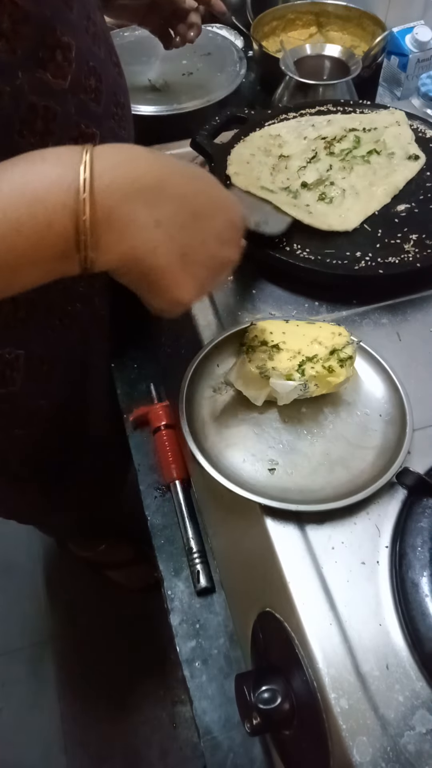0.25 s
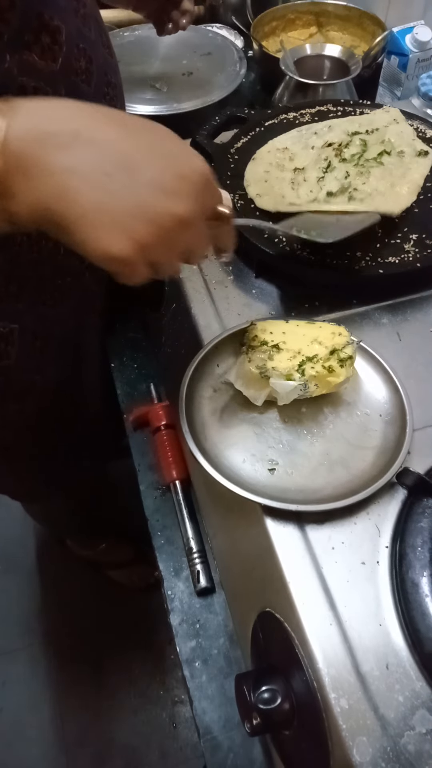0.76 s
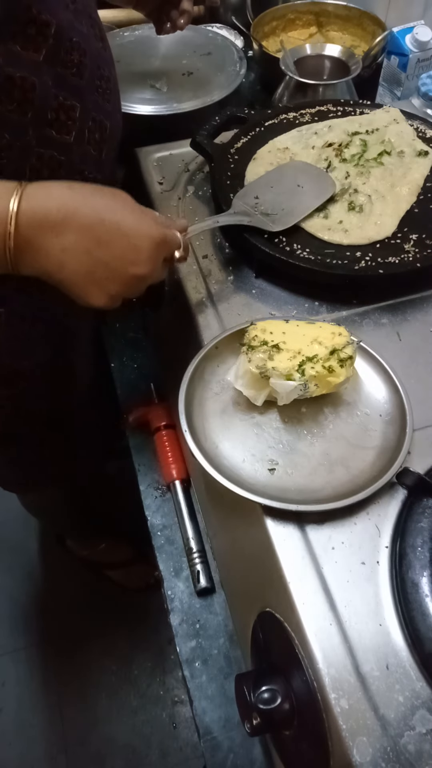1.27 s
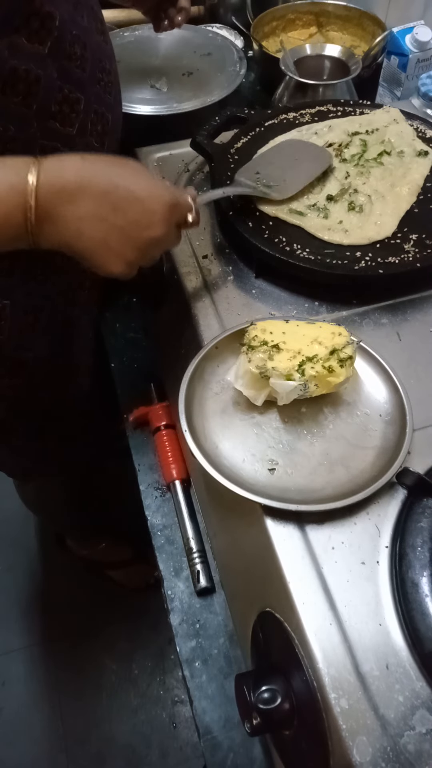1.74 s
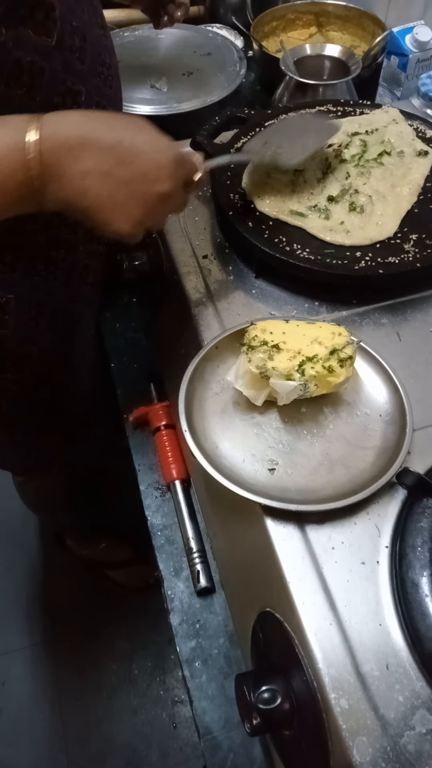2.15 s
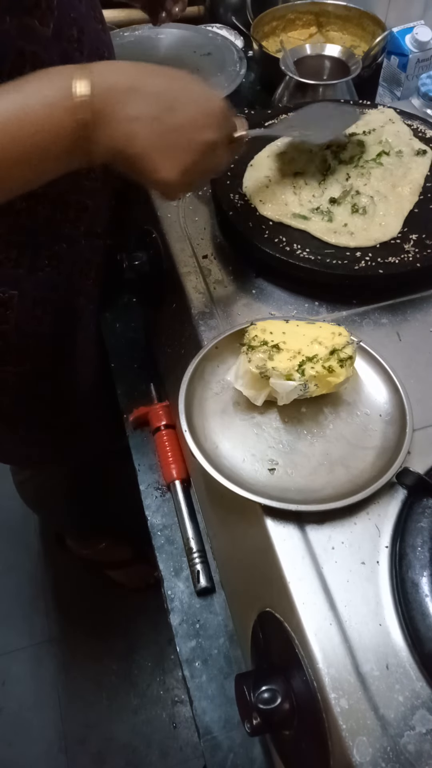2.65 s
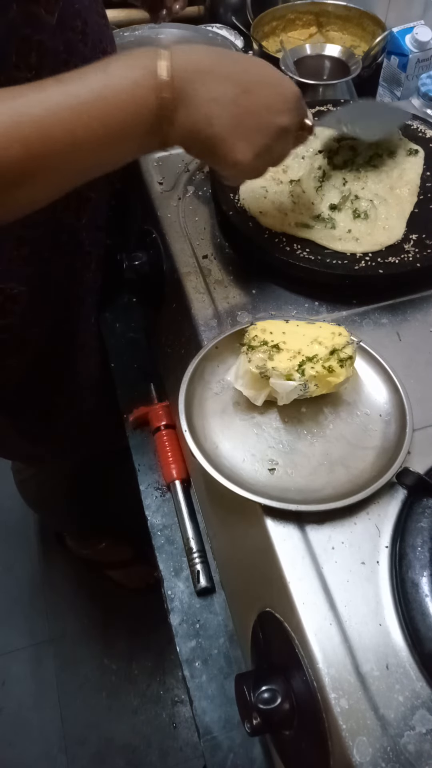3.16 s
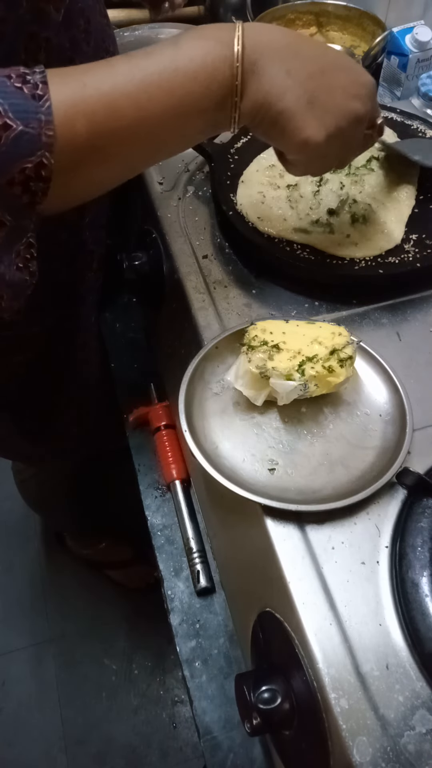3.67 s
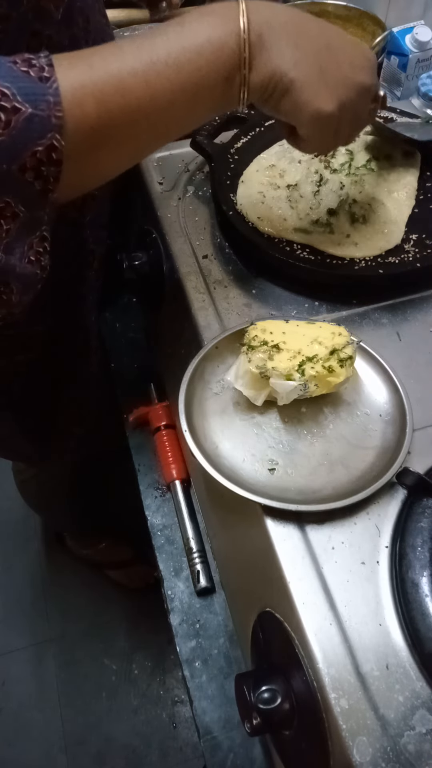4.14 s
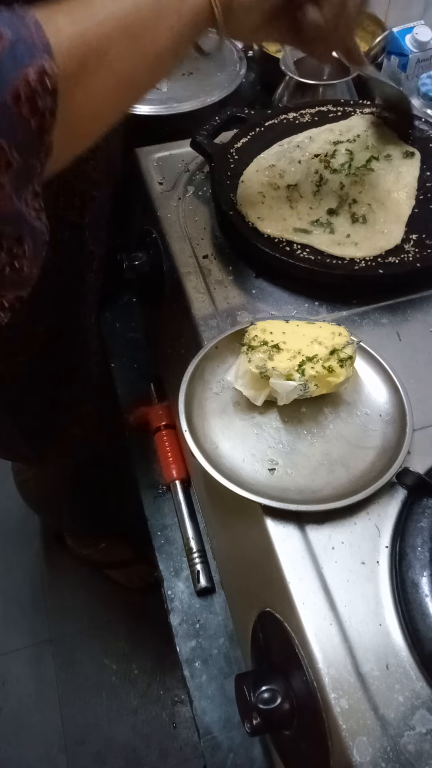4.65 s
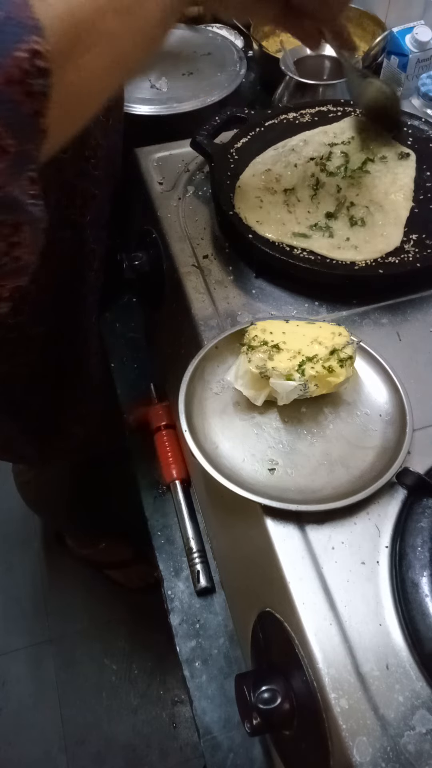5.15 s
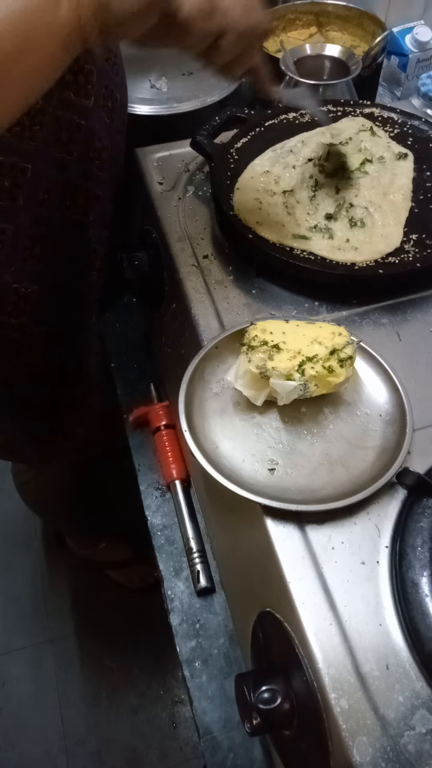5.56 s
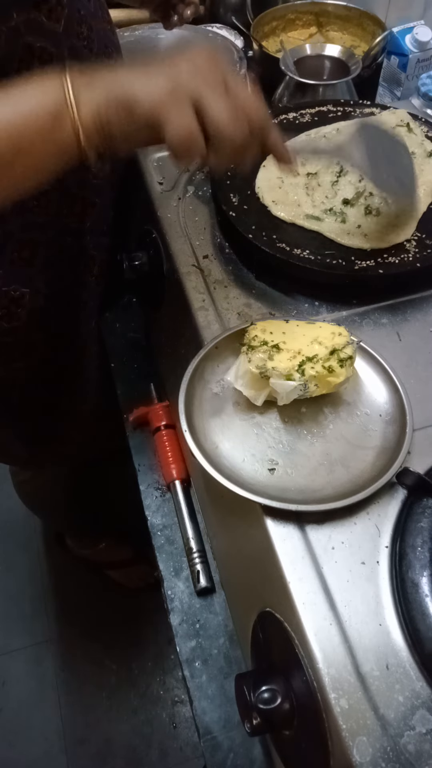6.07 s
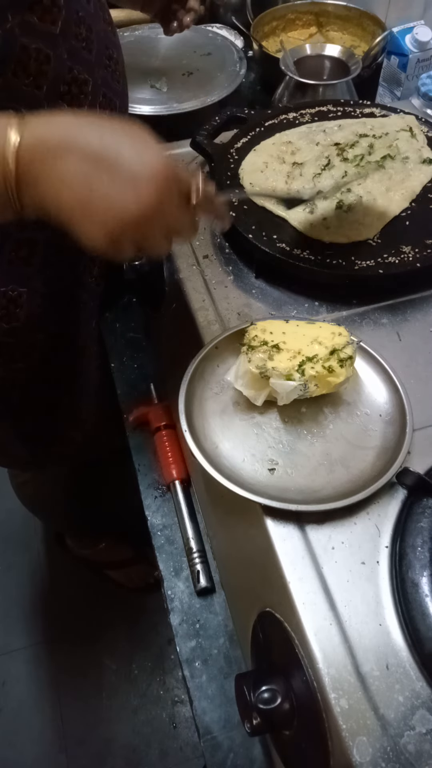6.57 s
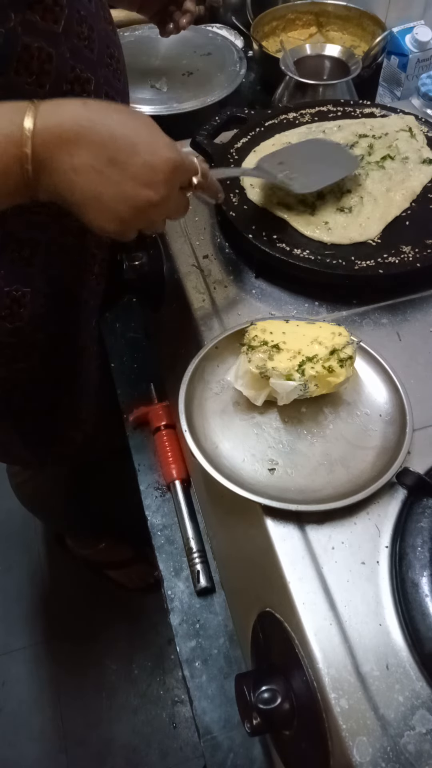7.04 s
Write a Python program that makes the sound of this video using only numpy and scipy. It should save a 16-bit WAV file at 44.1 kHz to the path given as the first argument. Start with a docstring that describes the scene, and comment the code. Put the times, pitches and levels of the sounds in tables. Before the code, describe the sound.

A thin steel spatula scrapes a cast-iron griddle, then clinks and clangs sharply in sparse bouts, over faint burner hiss in a small kitchen.

```python
"""In a small hard kitchen a thin steel spatula clinks on a cast-iron griddle, scrapes it and brushes the flatbread.
Blows are decaying noise that excites damped blade-and-pan modes, over a slow boom and thud; a few modes sing out alone.
Scrapes and brushes are uneven friction noise, coloured and swelling with speed; crumbs and fat tick in bright snaps.
Shaped noise makes the burner hiss and wavering sines the appliance hum; decaying noise makes the reflections."""
import sys
import numpy as np
from scipy import signal
from scipy.fft import rfft, irfft, next_fast_len
from scipy.io import wavfile
from scipy.ndimage import uniform_filter1d

SR = 44100
rng = np.random.default_rng(int(sys.argv[2]) if len(sys.argv) > 2 else 0)


def materialize(psi):
    """Save the field psi as 16-bit PCM at rate SR to the path in sys.argv[1].

    A 1-D psi becomes a single channel; in a 2-D psi each row is a channel.
    """
    bounded = np.clip(np.atleast_2d(psi).T, -1, 1)
    quanta = np.round(bounded * 32767).astype(np.int16)
    wavfile.write(sys.argv[1], SR, quanta)


def linear_from_db(decibels):
    """Turn decibels (scalar or array-like) into linear amplitude factors; 0 gives 1."""
    return 10 ** (np.asarray(decibels, float) / 20)


N = 322371

# impacts of blade on pan: t/s, nominal peak level/dB,
# then relative levels: pan boom/dB, low clatter/dB, edge sharpness (top band)/dB
BLOW_EVENTS = [(0.0044, -44, 1, -14, -3), (0.389, -32, -9, -14, -10), (0.4776, -42, -21, -3, -7),
               (0.798, -19, -16.5, -9, -8), (0.9989, -39.5, -18, -5.5, -19),
               (1.282, -10.5, -16, -11, -11.5), (3.7954, -14.5, -9, -7.5, -4.5),
               (3.9564, -20.5, -21, -1, -17), (4.1696, -46, -13, 13.5, -4),
               (4.6376, -2.5, -16.5, -7.5, -16), (4.7437, -16, -14.5, 0, -23.5),
               (5.2085, -32.5, -4.5, 5.5, -35), (5.783, -38.5, -36, -21, -9), (6.2932, -16, -6, -5, -12)]
# modes of blade and pan together: f/Hz, t60/s before contact damping, level when struck/dB
PLATE_MODES = [(339.5, 0.54, -13), (448, 0.19, -3.5), (635, 0.36, -2.5), (1043, 0.3, -4), (1163, 0.13, -6),
               (1449, 0.2, -17), (1780, 0.82, -21.5), (1878, 0.28, -5), (1967, 0.32, -6),
               (2127, 0.18, -0.5), (2240, 0.08, -0.5), (2450, 0.23, -10), (2437, 0.061, -2.5),
               (2784, 0.19, -1), (2620, 0.34, -32), (2820, 0.24, -19.5), (3013, 0.73, -24.5),
               (3050, 0.27, -18.5), (3580, 0.13, -29), (3840, 0.032, -8), (3870, 0.25, -11),
               (3880, 0.37, -26), (4190, .2, -24), (4320, 0.42, -35), (4220, 0.51, -21.5),
               (5210, 0.18, -20), (5700, 0.14, -24), (5870, 0.096, -33.5), (6800, .2, -26.5),
               (7130, 0.12, -30), (7770, 0.13, -28.5), (8550, 0.1, -31), (9040, 0.15, -23.5),
               (9160, .18, -25), (9620, .18, -23), (9740, .15, -25.5), (10090, 0.32, -34),
               (11400, .25, -31), (12600, .3, -34), (12800, .25, -34), (13200, 0.25, -39), (14400, .2, -43)]
TREBLE_UNDER_TOP_DB = -5  # a sharper edge lifts treble and top together


def unit(x):
    """Normalisation: scale to rms 1."""
    return x / np.sqrt(np.mean(x ** 2))


def colour(x, points):
    """Minimum-phase filtering: a causal response follows from the (f/Hz, level/dB) spectrum by its cepstrum."""
    hz = np.maximum(np.arange(1025) * SR / 2048, 10)
    point_hz, point_db = np.transpose(points)
    db = np.interp(np.log(hz), np.log(point_hz), point_db)
    cepstrum = irfft(np.log(linear_from_db(db)))
    # fold the cepstrum onto positive time
    cepstrum[1:1024] *= 2
    cepstrum[1025:] = 0
    response = irfft(np.exp(rfft(cepstrum)))
    return signal.fftconvolve(x, response)[:len(x)]


def split(x):
    """Complementary band filters: low, middle, treble and top parts add up to the whole."""
    # borders between the four bands: f/Hz
    edges_hz = [1400, 4700, 8200]
    size = next_fast_len(len(x))
    hz = np.arange(size // 2 + 1) * SR / size
    below = [0, *(np.clip(.5 - 5 * (hz / edge - 1), 0, 1) for edge in edges_hz), 1]
    spectrum = rfft(x, size)
    return [irfft(spectrum * (upper - lower), size)[:len(x)] for lower, upper in zip(below, below[1:])]


def walk(rate, count=N):
    """Slow random modulation: normal values, each held about 1 / rate s, are smoothed twice."""
    held = int(SR / rate)
    steps = np.repeat(rng.standard_normal(count // held + 1), held)
    return 0.97 * uniform_filter1d(uniform_filter1d(steps, held), held)[:count]


def add(out, sound, s):
    """Superposition: mix a sound in at time s."""
    i = int(s * SR)
    out[i:i + len(sound)] += sound[:N - i]


def fading(hz, t60, t):
    """Free damped oscillation: a sine falls by 60 dB in t60."""
    return np.sin(2 * np.pi * hz * t) * np.exp(-np.log(1000) * t / t60)


def crowd(count=110, t60_s=.13):
    """High modal density: many short plate modes sum; the place of contact picks them anew each time."""
    hz = 400 + 15200 * rng.random((count, 1))
    db = 5 * rng.standard_normal(count)
    response = linear_from_db(db) @ fading(hz, t60_s, np.arange(SR // 6) / SR)
    return response / np.sqrt(np.sum(response ** 2))


def burner(level_db=-57):
    """Broadband turbulence noise: a shaped hiss whose four bands swell a little on their own."""
    # hiss spectrum: f/Hz, relative level per Hz/dB
    burner_spectrum = [(15, -65), (25, -42), (64, -11.5), (127, -3.5), (195, -8.5), (236, -9), (354, -10),
                       (659, -13.5), (734, -11), (962, -15), (1160, -16.5), (3620, -17.5), (4610, -32),
                       (9570, -34.5), (16000, -39)]
    parts = split(colour(rng.standard_normal(N), burner_spectrum))
    hiss = sum(part * linear_from_db(1.0 * walk(5.) + 1.2 * walk(25.)) for part in parts)
    return linear_from_db(level_db) * unit(hiss)


def appliance_hum(waver_db=4.5):
    """Line spectrum: steady-pitched sines, each wavering in level on its own."""
    # hum lines: f/Hz, middle of the wavering peak level/dB
    hum_lines = [(100.5, -64.5), (124.5, -66), (188.4, -68.5), (360.7, -70.5), (452.2, -74.5), (963.6, -74)]
    t = np.arange(N) / SR
    hum = np.zeros(N)
    for hz, db in hum_lines:
        hum += linear_from_db(db + waver_db * walk(11.0)) * np.sin(2 * np.pi * (hz * t + rng.random()))
    return hum


def kitchen(dry, wet_db=-8.5, gap_s=0.0081):
    """Diffuse reverberation: dense reflections from tiles and steel; the treble dies first."""
    # reverberation time: f/Hz, t60/s
    kitchen_decay = [(200, 0.68), (1000, 0.49), (4000, 0.38), (12000, 0.32)]
    decay_hz, decay_s = np.transpose(kitchen_decay)
    t = np.arange(SR // 2) / SR
    tail = np.zeros(len(t))
    for hz in 125 * 2. ** np.arange(8):  # octave bands
        limits = [hz / np.sqrt(2), min(hz * np.sqrt(2), .48 * SR)]
        band = signal.butter(2, limits, "band", fs=SR, output="sos")
        t60 = np.interp(np.log(hz), np.log(decay_hz), decay_s)
        tail += signal.sosfilt(band, rng.standard_normal(len(t))) * np.exp(-np.log(1000) * t / t60)
    tail = tail * (t > gap_s)
    return dry + linear_from_db(wet_db) * signal.fftconvolve(dry, tail / np.sqrt(np.sum(tail ** 2)))[:N]


def ticks(t60_s=0.023):
    """Transient radiation of crumbs and fat: tiny snaps of band-passed, quickly decaying noise."""
    # ticks: t/s, nominal peak level/dB, f/Hz (the band spans about 0.85 f to 1.6 f)
    tick_events = [(1.4621, -51, 9680), (1.6214, -58, 13300), (3.1453, -41, 10500), (3.373, -55, 9530),
                   (4.3037, -43.5, 9100), (5.1994, -44, 9220), (6.0331, -52, 10180), (6.8513, -56, 5366),
                   (6.9966, -49, 6000), (7.0234, -52, 6000), (7.2522, -47.5, 9620), (7.2818, -53, 10600)]
    out, t = np.zeros(N), np.arange(2000) / SR
    for s, peak_db, hz in tick_events:
        band = signal.butter(2, [.85 * hz, min(1.6 * hz, .45 * SR)], "band", fs=SR)
        snap = signal.lfilter(*band, rng.standard_normal(len(t))) * np.exp(-np.log(1000) * t / t60_s)
        add(out, linear_from_db(peak_db) * snap, s)
    return out


def slides(events, up_db_per_s, down_db_per_s, ring_db, landing_s=0.0073, scatter_db=5, grit_db=1.0,
           judder_db=2.5, damped=2.36, brighten=0.39):
    """Friction excitation: uneven grit under an edge that speeds up, holds and slows also drives the modes."""
    # friction spectrum: f/Hz, relative level per Hz/dB
    friction_spectrum = [(88, -18.5), (150, -0.5), (172, -11), (213, -17), (328, 1), (484, -2.5), (524, -4),
                         (854, -4.5), (1450, -20.5), (2810, -9.5), (7320, -30), (9630, -17), (16000, -34)]
    out = np.zeros(N)
    t = np.arange(SR) / SR - .3  # zero when full speed is reached
    hz, t60, struck_db = np.transpose(PLATE_MODES)
    modes = fading(hz[:, None], t60[:, None] / damped, np.arange(SR // 3) / SR)
    landings = np.transpose(BLOW_EVENTS)[0]
    for s, held_s, level_db, low_db, sharp_db in events:
        # a slide that begins with a blow comes up to speed far faster
        lands = np.min(abs(landings - s)) < .02
        rise_db = t * (40 / landing_s if lands else up_db_per_s)
        slowed_db = np.minimum(rise_db, 0) - down_db_per_s * np.maximum(t - held_s, 0)
        speed = linear_from_db(level_db + slowed_db)
        edge_db = sharp_db + brighten * slowed_db  # a slower edge is also duller

        unevenness_db = grit_db * rng.standard_normal(SR) + judder_db * walk(61.9, count=SR)
        grit = rng.standard_normal(SR) * linear_from_db(unevenness_db)
        rubbed = grit + linear_from_db(ring_db) * signal.fftconvolve(grit, crowd())[:SR]
        part_db = (low_db, 0, edge_db + TREBLE_UNDER_TOP_DB, edge_db)
        parts = zip(split(colour(rubbed, friction_spectrum)), part_db)
        scrape = speed * sum(linear_from_db(db) * unit(part) for part, db in parts)

        # the contact picks the modes unevenly
        response = linear_from_db(struck_db + scatter_db * rng.standard_normal(len(hz))) @ modes
        response = response / np.sqrt(np.sum(response ** 2))
        ring = signal.fftconvolve(grit * speed, response)[:SR]
        sound = scrape + linear_from_db(ring_db) * ring
        start_s = s + t[0]
        skip = max(int(-start_s * SR), 0)
        add(out, sound[skip:], max(start_s, 0))
    return out


def bread_brushes():
    """Weakly coupled friction: the flat of the blade brushes the bread and rings little."""
    # brushes: t/s at full speed, held/s, friction level/dB, then relative: rumble/dB, edge sharpness/dB
    brush_events = [(1.47, 0.031, -68, 6, -1), (2.97, 0.077, -59.5, -4.5, -9),
                    (3.08, 0.077, -56.5, -3.5, -9), (3.39, .03, -64.5, -6, -9),
                    (5.785, 0.14, -50.5, -7, -9), (6.04, 0.03, -65.5, 5, -5), (6.9, 0.037, -59.5, -23, -4),
                    (7.01, .04, -63, -13, -6), (7.255, 0.034, -62, -7, -17)]
    return slides(brush_events, up_db_per_s=150, down_db_per_s=191, ring_db=-13.0)


def iron_scrapes():
    """Strongly coupled friction: the edge scrapes bare iron and rings it."""
    # scrapes: t/s at full speed, held/s, friction level/dB, then relative: rumble/dB, edge sharpness/dB
    scrape_events = [(0.0, 0.011, -51.5, 2.5, -2), (.1, 0.1, -53.5, -6, -8), (.22, 0.055, -50, -3.5, -8),
                     (.365, 0.14, -47.5, -17, -9.5), (4.05, 0.016, -53, -1, -17),
                     (4.14, 0.033, -52.5, 3.5, -11), (4.3, 0.065, -59, -3, -9), (4.78, 0.06, -46, -3, -8.5),
                     (5.213, 0.023, -46.5, 10.5, -28), (5.295, 0.0081, -43, -16, -7)]
    return slides(scrape_events, up_db_per_s=189, down_db_per_s=151.5, ring_db=-2.5)


def singing_modes(rough=1.67, contact_width=.06, swell=0.23, settle_s=0.063, rub_s=.075, bend=.012):
    """Driven, then free vibration: a mode swells, rough and widened, under contact and then rings out."""
    # single modes left free by the contact: t/s, f/Hz before bending, level/dB before roughness, driven for/s
    note_events = [(0, 1780, -50.5, 0.037), (0, 4170, -47.5, 0.04), (0, 1203, -54, 0.06),
                   (0, 2417, -51.5, .03), (0.19, 2740, -56, 0.087), (.2, 3720, -49, 0.059),
                   (.229, 1935, -51.5, 0.067), (.3, 655, -51.5, 0.14), (.318, 3360, -45.5, 0.18),
                   (.339, 2510, -51, 0.081), (.341, 5416, -57.5, .16), (0.399, 3020, -53, 0.108),
                   (.35, 1876, -50.5, 0.167), (.799, 1048, -39, 0.051), (.8, 360, -40, 0.044),
                   (1.282, 428, -41, 0.094), (1.28, 4220, -42, 0.031), (3.794, 2482, -30.5, 0.047),
                   (3.795, 3157, -46, 0.032), (3.799, 4200, -32, 0.029), (3.957, 2511, -29.5, .006),
                   (3.958, 635, -29.5, 0.017), (4.131, 2555, -53.5, 0.049), (4.286, 1196, -56, 0.046),
                   (4.637, 5870, -30, 0.041), (4.64, 4370, -31.5, .014), (4.769, 1052, -40, 0.044),
                   (4.821, 4310, -50, 0.053), (5.212, 1896, -43.5, 0.067), (5.26, 324.5, -45, 0.058),
                   (5.276, 1858, -38, 0.027), (5.275, 2900, -43, 0.056), (5.3, 4180, -47.5, .03),
                   (6.292, 4310, -38, 0.035), (6.298, 3320, -43.5, 0.028), (6.296, 2723, -28, 0.018),
                   (6.336, 1862, -32.5, 0.017)]
    out, t = np.zeros(N), np.arange(SR // 2) / SR
    mode_hz, mode_t60 = np.transpose(PLATE_MODES)[:2]
    for s, hz, db, driven_s in note_events:
        t60 = mode_t60[np.argmin(abs(mode_hz - hz))]  # of the nearest listed mode
        free_s = np.maximum(t - driven_s, 0)
        shape = np.minimum(t / (swell * driven_s), 1) * np.exp(-np.log(1000) * free_s / t60)
        wobble = [walk(25.0 + contact_width * hz, count=len(t)) for _ in range(2)]
        # a short knock leaves the mode cleaner than a long rub
        contact = min(driven_s / rub_s, 1) * np.exp(-free_s / settle_s)
        carrier = 1 + rough * contact * (wobble[0] + 1j * wobble[1])
        # pitch wanders as the blade flexes
        flexed_hz = hz * (1 + bend * contact * walk(12., count=len(t)))
        oscillation = np.exp(2j * np.pi * np.cumsum(flexed_hz) / SR)
        add(out, linear_from_db(db) * shape * (carrier * oscillation).imag, s)
    return out


def blows(rattle_s=0.037, rise_s=0.00064, top_rattle_s=0.01, ring_db=-5.5, scatter_db=4.0,
          crowd_db=-2.5, crest_db=10.5):
    """Impact excitation: the loose blade rattles and drives modes damped by the hand; pan and stove boom."""
    # clatter spectrum: f/Hz, relative level per Hz/dB
    clatter_spectrum = [(88, -54), (150, -14), (309, 1), (662, 1), (1190, -3.5), (1390, -6), (1560, -7),
                        (2550, 4.5), (3920, -0.5), (4240, 1.5), (5360, -21.5), (5790, -17), (6510, -17),
                        (9630, -28.5), (16000, -40)]
    out, booms, t = np.zeros(N), np.zeros(N), np.arange(SR // 2) / SR
    hz, t60, struck_db = np.transpose(PLATE_MODES)
    modes = fading(hz[:, None], t60[:, None] / 1.15, t)  # the hand shortens every ring
    boom_rise = 1 - np.exp(-t / 0.027)
    boom = fading(328.7, .46, t) * boom_rise
    # the stove top under the pan, tapered to silence
    thud_db = -41
    thud = fading(101.6, 0.99, t) * boom_rise * (1 - t / t[-1])
    start = slice(0, SR // 100)  # the levels of a blow hold for its first 10 ms
    for s, peak_db, boom_db, low_db, sharp_db in BLOW_EVENTS:
        rattle = rng.standard_normal(len(t)) * linear_from_db(0.33 * walk(260.0, count=len(t)))
        rattle = rattle * (1 - np.exp(-t / rise_s))
        drive = rattle * np.exp(-2 * t / rattle_s)
        response = linear_from_db(struck_db + scatter_db * rng.standard_normal(len(hz))) @ modes
        ring = signal.fftconvolve(response, drive)[:len(t)]
        clangs = signal.fftconvolve(drive, crowd())[:len(t)]
        shaken = unit(rattle * np.exp(-t / rattle_s)) + linear_from_db(crowd_db) * unit(clangs)

        struck = unit(colour(shaken, clatter_spectrum)) + linear_from_db(ring_db) * unit(ring)
        low, middle, treble, top = split(struck)
        top = top * (np.exp(-t / top_rattle_s) + 0.83)  # emphasise the first crack
        part_db = (low_db, 0, sharp_db + TREBLE_UNDER_TOP_DB, sharp_db)
        parts = zip((low, middle, treble, top), part_db)
        clatter = sum(linear_from_db(db) * part / np.std(part[start]) for part, db in parts)
        add(out, linear_from_db(peak_db - crest_db) * clatter, s)

        uneven_boom = linear_from_db(boom_db + 4.2 * walk(34.6, count=len(t))) * boom
        add(booms, linear_from_db(peak_db) * (uneven_boom + linear_from_db(thud_db) * thud), s)
    # thin steel radiates no deep bass
    thin_steel = signal.butter(2, 120, "high", fs=SR, output="sos")
    return signal.sosfilt(thin_steel, out), booms


def scene():
    """Direct and reverberant fields: booms and long pure rings reach the listener with weaker reflections."""
    background = burner() + appliance_hum()
    clatter, booms = blows()
    contact_noise = clatter + iron_scrapes() + bread_brushes() + ticks()
    pan_rings = booms + singing_modes()
    return (kitchen(contact_noise) + kitchen(pan_rings, wet_db=-10.5) + background)[None]


def roll_off(x):
    """The treble ends steeply here."""
    return signal.sosfilt(signal.butter(12, 16650, fs=SR, output="sos"), x)


def record(dry):
    """Resonance and band limits: the microphone port lifts a treble band; the phone cuts deep bass and top."""
    port_hz, port_width_hz, port_gain = 9560, 990, 1
    port = signal.iirpeak(port_hz, port_hz / port_width_hz, fs=SR)
    heard = dry + port_gain * signal.lfilter(*port, dry)
    heard = signal.sosfilt(signal.butter(1, 30, "high", fs=SR, output="sos"), heard)
    heard = signal.sosfilt(signal.ellip(8, .2, 60, 15900, fs=SR, output="sos"), heard)
    return roll_off(heard)


dry = scene()
out = record(dry)
materialize(out)
```